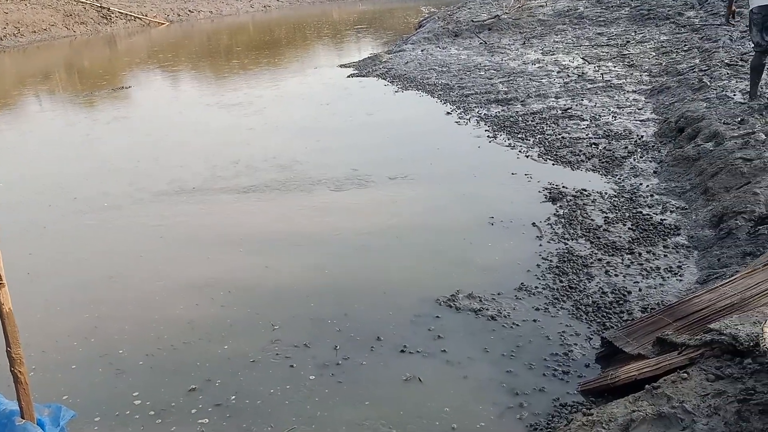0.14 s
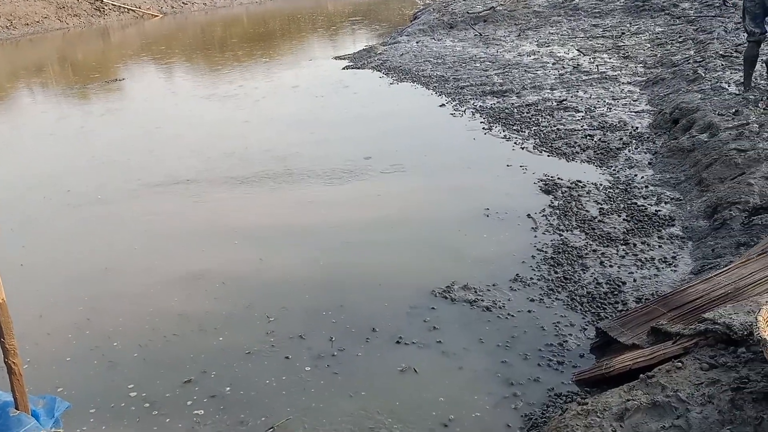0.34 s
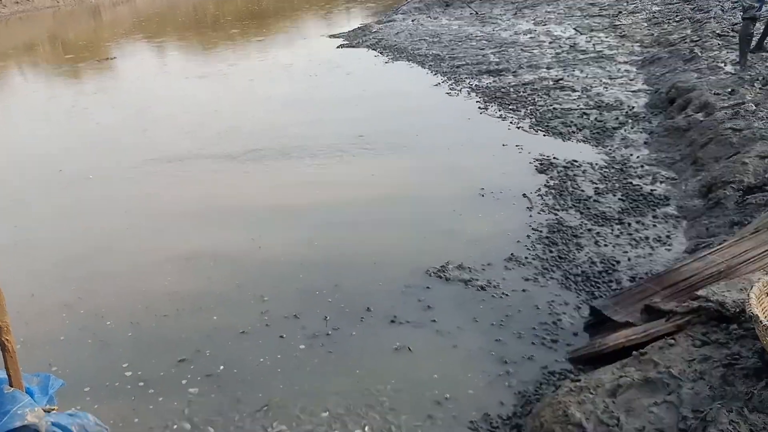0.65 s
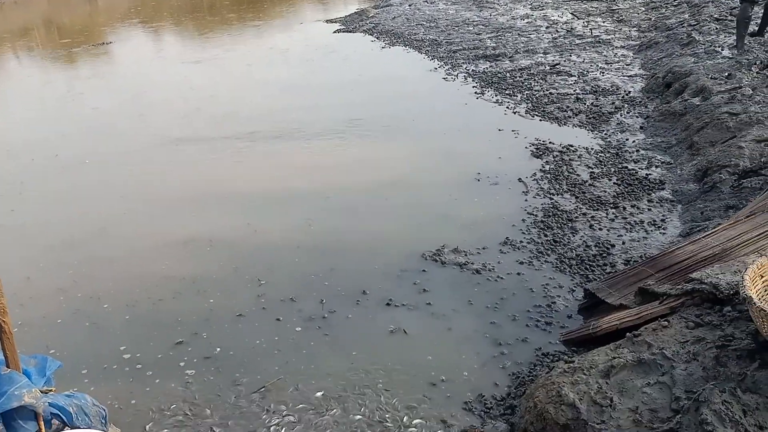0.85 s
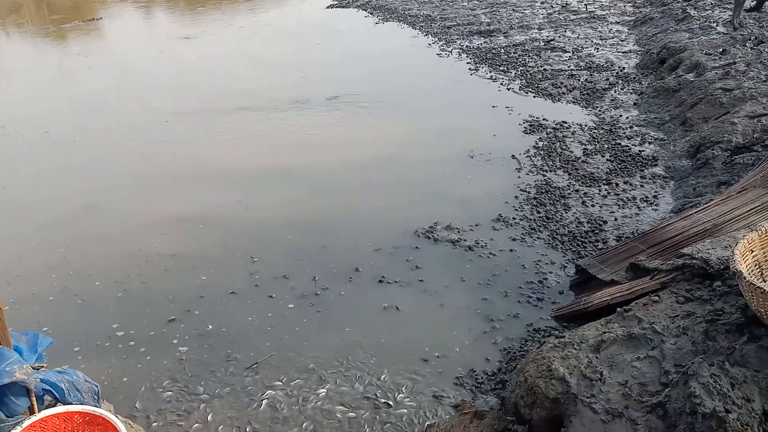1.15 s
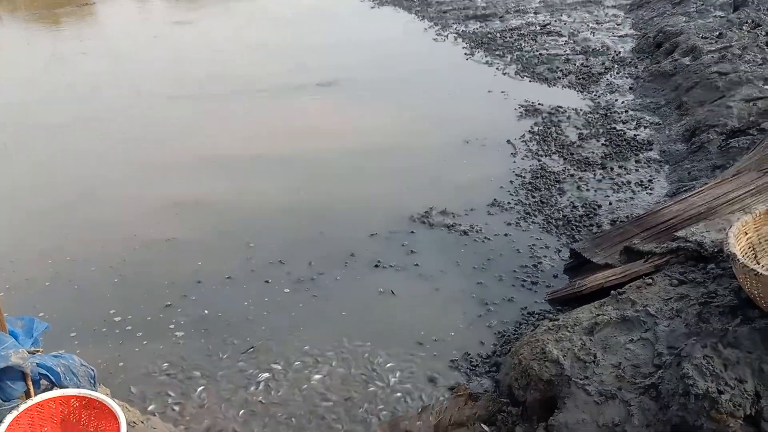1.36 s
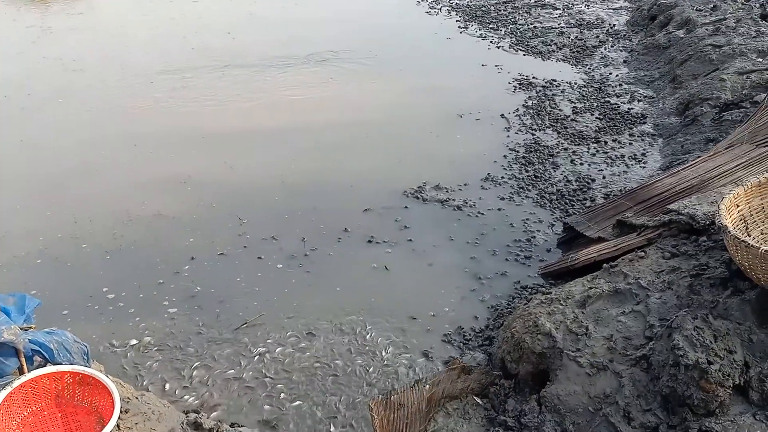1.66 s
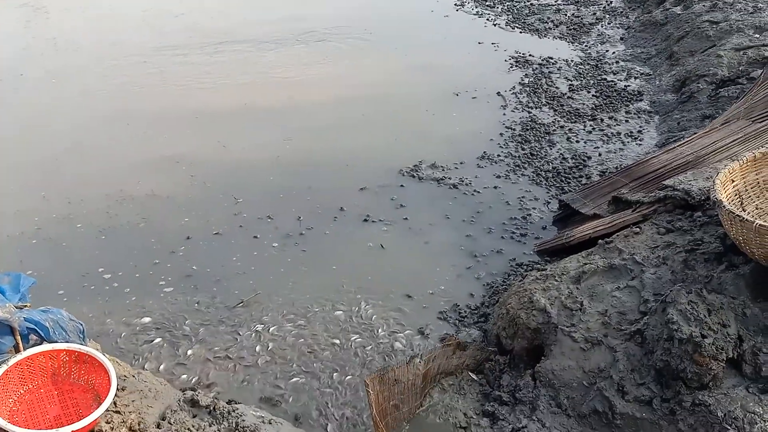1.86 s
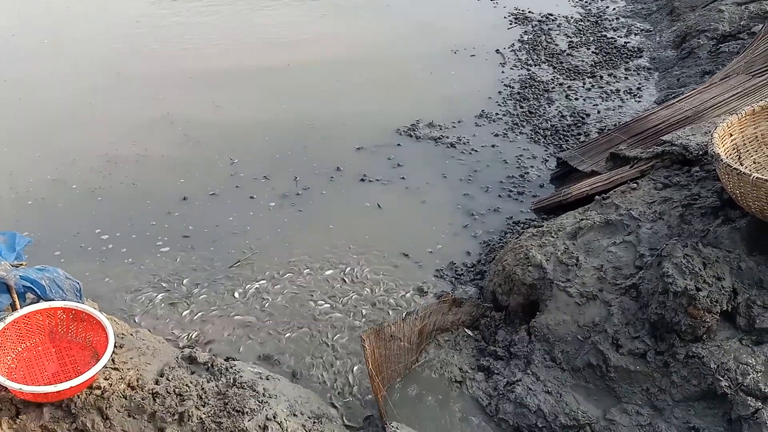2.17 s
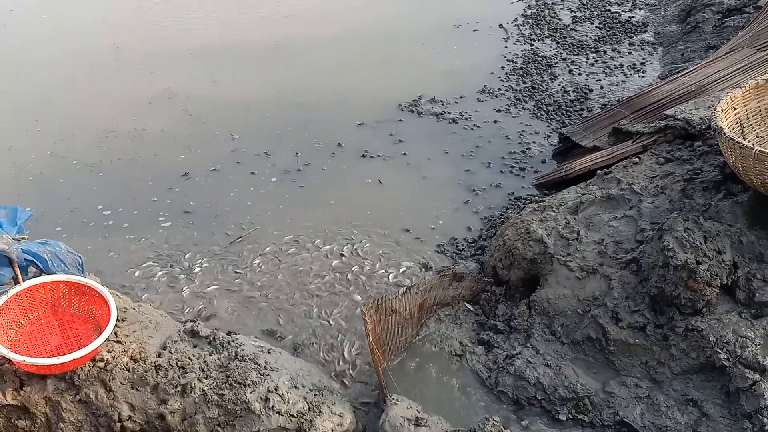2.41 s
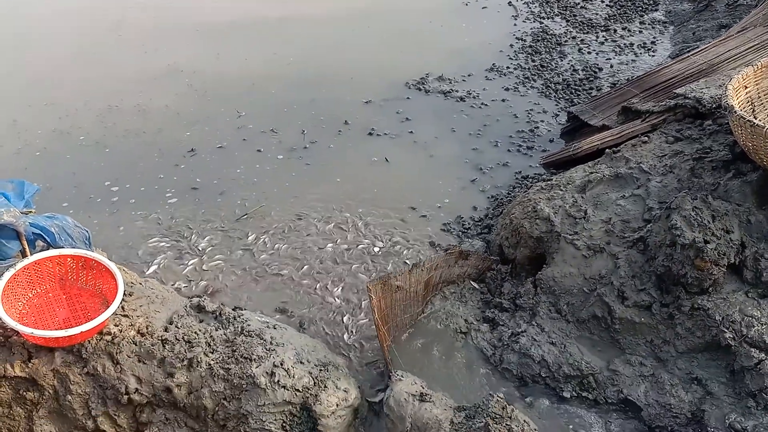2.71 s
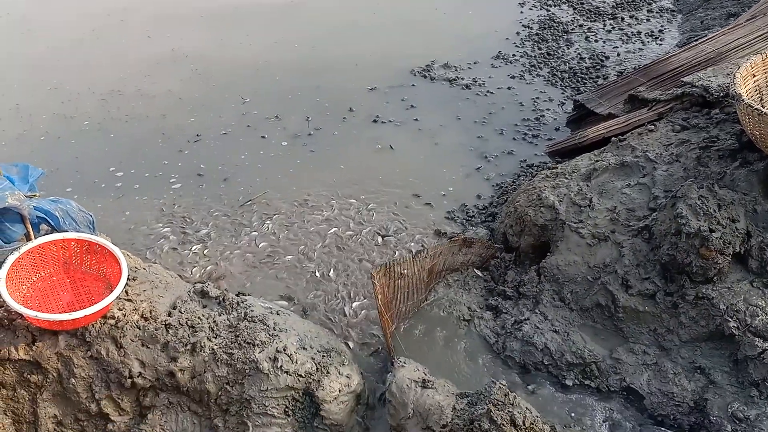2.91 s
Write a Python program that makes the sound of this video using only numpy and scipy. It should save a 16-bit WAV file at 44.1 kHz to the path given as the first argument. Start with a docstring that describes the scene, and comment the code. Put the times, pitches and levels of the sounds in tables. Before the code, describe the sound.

A near single-cylinder diesel pump chugs throughout at about twelve beats a second, each beat a low thud with ringing metal clatter around 2-3 kHz. A fainter engine thuds slightly faster. A wavering hollow tone is strongest in the first 0.5 s. Water hisses and drops patter and tick; fish plop near 0.3, 1.2 and 2.0-2.3 s, clustering at 2.7-2.9 s. Outdoor stereo phone sound.

```python
"""On a muddy bank a slow single-cylinder pump engine chugs close by; a slightly faster one thuds farther off.
Each near cycle gives low exhaust swings and three noise bursts that ring the casing; a hollow tone wavers.
Water and air hiss, flicked drops tick as bursts of noise, and fish flip in the shallows as short rough tones.
A phone with two ports hears the bass alike and the treble coloured and staggered."""
import sys
import numpy as np
from scipy import signal
from scipy.fft import rfft, irfft, next_fast_len
from scipy.io import wavfile
from scipy.ndimage import uniform_filter1d

SR = 44100
rng = np.random.default_rng(int(sys.argv[2]) if len(sys.argv) > 2 else 0)


def inscribe(sig):
    """Save sig as 16-bit PCM at rate SR to the path in sys.argv[1].

    A 1-D sig is mono; a 2-D sig holds one channel per row.
    Samples are clipped to [-1, 1] before scaling.
    """
    pcm = np.round(np.clip(np.atleast_2d(sig).T, -1, 1) * 32767)
    wavfile.write(sys.argv[1], SR, pcm.astype(np.int16))


def invert_db(x):
    """Field ratio 10**(x/20) for x, a level in decibels (scalar or array-like)."""
    u = np.asarray(x, float) / 20
    return 10 ** u


N = 134505
T = np.arange(N) / SR
SIZE = next_fast_len(N + SR // 4)
HZ = np.arange(SIZE // 2 + 1) * SR / SIZE + 1e-3


def on_hz(table):
    """A (Hz, value) table read on a log frequency axis."""
    f, v = np.array(table, float).T
    return np.interp(np.log(HZ), np.log(np.maximum(f, 1)), v)


def filt(x, gain):
    """Applies a frequency response."""
    return irfft(rfft(x, SIZE) * gain, SIZE)[..., :N]


def unit(x):
    """Scales to rms 1."""
    return x / np.sqrt(np.mean(x ** 2))


def noise(rows=3):
    """White noise; three rows are the part common to both ports, left only and right only."""
    return rng.standard_normal((rows, N))


def slow_walk(hold, smooth):
    """Random levels held for some samples, then smoothed."""
    steps = np.repeat(rng.standard_normal(N // hold + 1), hold)
    return uniform_filter1d(steps, smooth)[:N]


def ring(hz, width_hz):
    """Response of one resonance."""
    return 1 / (1 + 1j * (HZ ** 2 - hz ** 2) / (HZ * width_hz))


def train(times, shape):
    """Sum of shape(seconds since event, index) over events."""
    out = np.zeros(N)
    for k, t0 in enumerate(times):
        first = max(int((t0 - .04) * SR), 0)
        i = np.arange(first, min(int((t0 + .07) * SR), N))
        out[i] += shape(i / SR - t0, k)
    return out


def exhaust(times, puffs):
    """Pressure swings of an exhaust that swell and die, a little different each cycle."""
    scatter_db, jitter_ms, pitch_scatter = 1.5, .3, .018
    out = 0
    for ms, hz, swell_ms, fade_ms, db in puffs:
        c = rng.standard_normal((len(times), 3))

        def swing(t, k):
            level = invert_db(db + scatter_db * c[k, 1])
            width_ms = np.where(t < 0, swell_ms, fade_ms)
            envelope = np.exp(-.5 * (1000 * t / width_ms) ** 2)
            return -level * np.cos(2 * np.pi * hz * (1 + pitch_scatter * c[k, 2]) * t) * envelope
        out = out + train(times + (ms + jitter_ms * c[:, 0]) / 1000, swing)
    return out


# The farther engine's exhaust swings.
# Each row: time from the puff in ms, pitch in Hz, swell in ms, fade in ms, level in dB.
FAR_SWINGS = [(0, 148, 7, 6.5, -33.5), (13.3, 200, 2, 2.5, -41), (20, 150, 2, 5, -46)]


def far_engine():
    """The farther engine fires at an even rate and only its low exhaust carries."""
    rate_hz, first_s = 13.695, .0066
    times = first_s + np.arange(-1, int(N / SR * rate_hz) + 2) / rate_hz
    return exhaust(times, FAR_SWINGS)


# The near engine's running speed. Each row: time in seconds, firings per second.
NEAR_SPEED = [(0, 12.17), (1.58, 12.17), (1.65, 12.067), (3.05, 12.067)]


def near_firings():
    """Moments of the near engine's puffs: whole turns of the summed speed, and one more at each end."""
    first_puff_s = .0528
    turns = np.cumsum(np.interp(T, *np.array(NEAR_SPEED).T)) / SR
    turns = turns - np.interp(first_puff_s, T, turns)
    mid = np.interp(np.arange(int(turns[-1]) + 1), turns, T)
    return np.r_[mid[0] - 1 / NEAR_SPEED[0][1], mid, mid[-1] + 1 / NEAR_SPEED[-1][1]]


# The near engine's exhaust swings.
# Each row: time from the puff in ms, pitch in Hz, swell in ms, fade in ms, level in dB.
NEAR_SWINGS = [(-19.3, 170, 3, 6, -41), (-8.3, 260, 2, 1.5, -38), (.4, 125, 6, 3.2, -28),
               (.4, 200, 1.5, 7, -38), (17.4, 310, 2.5, 3.5, -38), (26, 350, 4, 12, -47),
               (40.5, 220, 4, 2, -48)]


def near_exhaust(times):
    """The near engine's low exhaust swings, timed from each firing."""
    return exhaust(times, NEAR_SWINGS)


def burst(times, ms, rise_ms, fall_ms, scatter_db):
    """Envelope that rises and falls once a cycle; slower rises peak lower."""
    c = rng.standard_normal((len(times), 2))

    def shape(t, k):
        u = np.maximum(1000 * t, 0)
        return invert_db(scatter_db * c[k, 0]) * (1 - np.exp(-u / rise_ms)) * np.exp(-u / fall_ms)
    return train(times + (ms + .5 * c[:, 1]) / 1000, shape)


# Clatter of one cycle: diesel knock, valve, blow-down.
# Each row: time from the puff in ms, rise in ms, fall in ms, scatter in dB.
CLATTER_BURSTS = [(-26, .4, 9, 1.2), (-8, .6, 4.5, 1.5), (12.5, 3, 9, 1.4)]
# Casing resonances. Each row: pitch in Hz, width in Hz, then the drive in dB from knock,
# from valve, from blow-down and from the steady rattle.
CASING_RINGS = [(1280, 500, -40.5, -36.5, -42, -56), (1800, 340, -33, -32, -36.5, -49),
                (2349, 188, -28.5, -27.5, -32.5, -41), (2510, 790, -41.5, -32, -28, -45),
                (2858, 265, -31.5, -36, -33, -45.5), (4120, 2450, -49, -39, -35.5, -49.5),
                (6940, 1700, -49.5, -41, -60, -53)]


def clatter(times):
    """Metal noise, gated by the cycle, rings each part of the casing; the top hisses more softly."""
    spike_db, wander_db = 2.5, 1.5
    split = .014  # each resonance is a close pair whose halves wax and wane alone
    spikes = np.minimum(rng.exponential(size=N // 40 + 1), 2.8)
    crackle = np.repeat(invert_db(spike_db * spikes), 40)[:N]
    gates = [burst(times, *b) for b in CLATTER_BURSTS]
    out = 0
    for hz, width_hz, *db in CASING_RINGS:
        bursts_power = sum((invert_db(d) * g) ** 2 for d, g in zip(db, gates))
        gate = np.sqrt(bursts_power + invert_db(db[-1]) ** 2)
        for half_hz in (hz * (1 - split), hz * (1 + split)):
            wander = invert_db(wander_db * slow_walk(1500, 700))
            if hz < 3500:
                drive = unit(noise() * crackle) * gate
            else:
                drive = noise() * uniform_filter1d(gate, size=300)
            level = np.sqrt(SR / 2 / np.pi / width_hz)  # evens out narrow and wide rings
            out = out + filt(drive * wander, level * ring(half_hz, width_hz) ** 2)
    return out


# Level curve of the hollow tone, uneven by chance.
# Each row: time in seconds, level in dB before the tone's lift.
SHEET_LEVEL = [(0.0, -38.5), (0.11, -55), (0.13, -82), (0.16, -40.5), (0.26, -67), (0.31, -47.5),
               (0.37, -39.5), (0.43, -60), (0.49, -46.5), (0.52, -54), (1.41, -50.5), (1.48, -79),
               (1.51, -50.5), (1.92, -50.5), (2.17, -67), (3.05, -67)]


def loose_sheet(times):
    """A hollow tone, perhaps a loose sheet, rises after each blow-down and wavers in pitch."""
    hz, waver_hz, scatter_db, lift_db = 762, 20, 4.5, 7.5
    level = invert_db(lift_db + np.interp(T, *np.array(SHEET_LEVEL).T))
    shake = (burst(times, 19.2, 1.3, 13.7, scatter_db) + 0.36) * level
    waver = unit(filt(rng.standard_normal(N), ring(10.1, 47)))
    tone = np.sin(2 * np.pi * np.cumsum(hz + waver_hz * waver) / SR)
    return shake * tone * np.array([[1], [.4], [.4]])


# Colour of running water and air. Each row: frequency in Hz, relative density in dB per Hz.
WASH_COLOUR = [(18, -54), (30, -27.5), (140, -11.5), (349, -21.5), (503, -25.5), (764, -23.5),
               (1550, -21.5), (2350, -18), (3860, -28), (6680, -41), (8230, -72), (13900, -75),
               (15400, -87)]


def wash():
    """Steady hiss of running water and air whose octaves flicker alone."""
    flicker_db, level_db = 2.5, -40.5
    out, colour = 0, invert_db(on_hz(WASH_COLOUR))
    for hz in 30 * 2. ** np.arange(10):
        flicker = invert_db(flicker_db * slow_walk(2000, 2000))
        band = np.clip(1 - abs(np.log2(HZ / hz)), 0, 1) ** .5
        out = out + flicker * filt(noise(), colour * band)
    return unit(out) * invert_db(level_db)


def spray():
    """A patter of small drops: brief noise puffs at random moments and levels in six pitch bands."""
    per_s, level_db, width_ms = 37, -52, 5.45
    out = 0
    for hz, tilt_db in [(1100, -2.5), (1700, 1), (3600, 0.5), (5200, -4.5), (7000, -0.5), (12500, -18.0)]:
        c = rng.random((int(per_s * N / SR), 2))
        drop_db = level_db + tilt_db - 1.12 * np.log(c[:, 1] + 0.039)
        gate = train(c[:, 0] * N / SR, lambda t, k: invert_db(drop_db[k]) * np.exp(-(1000 * t / width_ms) ** 2))
        out = out + unit(filt(noise(), ring(hz, hz / 3) ** 2)) * gate
    return out


# Flicked drops. Each row: start in seconds, splash level in dB, top octave level in dB,
# both levels before the trims below.
FLICKED_DROPS = [(0.125, -33, -72), (0.2881, -36, -71), (0.6, -36.5, -62), (0.6942, -42, -62),
                 (0.7882, -31, -69), (1.27, -45, -58), (1.471, -35.5, -57), (1.716, -39.5, -61),
                 (1.8756, -33.5, -68), (1.9674, -36, -68), (2.373, -36, -75), (2.576, -34.5, -73),
                 (2.7023, -31.5, -72), (2.7846, -35, -73), (2.9177, -44, -62)]


def flicks():
    """Short bright ticks of flicked water: noise that starts at once and dies away, in two bands."""
    fade_ms, body_trim_db, top_trim_db = 10.4, -3, 4
    s, body_db, top_db = np.array(FLICKED_DROPS).T
    body = (body_db + body_trim_db, ring(4140, 2400) ** 2)
    top = (top_db + top_trim_db, ring(12000, 4000) ** 2)
    out = 0
    for db, colour in (body, top):
        gate = train(s, lambda t, k: invert_db(db[k]) * (t > 0) * np.exp(-1000 * abs(t) / fade_ms))
        out = out + filt(noise() * gate, colour / np.sqrt(np.mean(abs(colour) ** 2)))
    return out


# Fish plops. Each row: time in seconds, level in dB before trim and roughness, pitch in Hz before the
# glide, pan as left minus right in dB.
FISH_PLOPS = [(0.287, -34.5, 1194, 0), (0.357, -35, 960, 3), (1.187, -27, 1467, -7),
              (1.281, -33.5, 873, -1), (1.498, -37, 1154, 1), (2.048, -27, 1830, -3),
              (2.103, -31.5, 1116, 4), (2.255, -35, 1370, -5), (2.289, -30, 1143, -1.5),
              (2.668, -35, 1930, 5), (2.7, -32.5, 1306, -1.0), (2.729, -30.5, 1367, -5),
              (2.752, -40.5, 1804, 24), (2.799, -30, 1900, 3), (2.942, -33.5, 1130, 0),
              (2.712, -30, 445, -3), (2.755, -31, 1143, 0), (2.799, -33, 1183, 4), (0.3965, -41, 3410, -2),
              (2.79, -28, 3410, -3)]


def plops():
    """Splashes of flipping fish: short rough tones that glide up a little."""
    swell_ms, glide, trim_db, roughness = 4.5, .015, -5, 1.1
    s, db, hz, pan_db = np.array(FISH_PLOPS).T
    rough = 1 + roughness * unit(filt(noise(2), ring(160, 330) ** 2))

    def shape(t, k):
        u = np.maximum(t * 1000 / swell_ms + .5, 0)
        tone = np.sin(2 * np.pi * hz[k] * t * (1 + glide * (u / 2 - 1)))
        return invert_db(db[k] + trim_db) * tone * u * np.exp(1 - u)
    sides = [train(s, lambda t, k: shape(t, k) * invert_db(sign * pan_db[k] / 2)) for sign in (1, -1)]
    return rough * np.array(sides)


# Level between the phone's ports. Each row: frequency in Hz, left minus right in dB.
PORT_LEVEL = [(60, 0), (200, 0.4), (350, -5), (460, -6), (560, 4.9), (760, -1), (1300, -4), (1900, -2),
              (2330, -12), (2600, -4), (2880, -8), (4400, -2), (5500, -1), (6600, 3.94), (8000, 3.3),
              (10500, -3), (13300, -17), (15000, -12)]


def port_tilt():
    """The left port's half of the level difference; the right port has its inverse."""
    return invert_db(on_hz(PORT_LEVEL) / 2)


def thud_at_ports(thud):
    """The thuds reach both ports in step; their upper body grows as the phone turns."""
    body_hz, growth = 320, 0.6
    thud = thud + growth * (T / T[-1] - .5) * filt(thud, ring(body_hz, body_hz))
    return filt(thud, np.array([port_tilt(), 1 / port_tilt()]))


# Phase between the ports. Each row: frequency in Hz, radians by which the left leads.
PORT_LEAD = [(0, 1), (950, 0.94), (1210, 0.86), (1550, 2), (1810, 5), (2150, 5.5), (2410, 5), (4310, 9.5),
             (5940, 12.5), (7670, 8.5), (8530, 4), (10900, -5.5), (11600, -7), (15200, 4)]
# How alike the ports hear. Each row: frequency in Hz, likeness from 0 to 1.
PORT_LIKENESS = [(60, 0.96), (300, 1), (700, 0.76), (1500, 0.45), (3000, 0.43), (6000, 0.37), (15000, 0.25)]


def ports(x):
    """Rows common, left-only, right-only become left and right with each port's colour and lag."""
    like = np.clip(on_hz(PORT_LIKENESS), 0, 1)
    half = port_tilt() * np.exp(.5j * on_hz(PORT_LEAD))
    side = np.array([half, 1 / half])
    return filt(x[0], np.sqrt(like) * side) + filt(x[1:], np.sqrt(1 - like) * side)


def scene():
    """Both engines, the water and the fish at the phone's two ports."""
    near = near_firings()
    thud = thud_at_ports(far_engine() + near_exhaust(near))
    metal = clatter(near) + loose_sheet(near)
    water = wash() + spray() + flicks()
    return thud + ports(metal + water) + plops()


# The phone microphone's colour. Each row: frequency in Hz, gain in dB.
MIC_COLOUR = [(25, -8.5), (60, -0.5), (6800, -2), (8000, -16.5), (14000, -8.5), (14800, -8), (15500, -43)]


def microphone(x):
    """The frequency response shared by both ports."""
    return filt(x, invert_db(on_hz(MIC_COLOUR)))


def roll_off(x):
    """The treble ends steeply here."""
    return signal.sosfilt(signal.butter(12, 15670, fs=SR, output="sos"), x)


def record(dry):
    """The scene as the phone keeps it, through its microphone."""
    mix = microphone(dry)
    return roll_off(mix)


dry = scene()
out = record(dry)
inscribe(out)
```